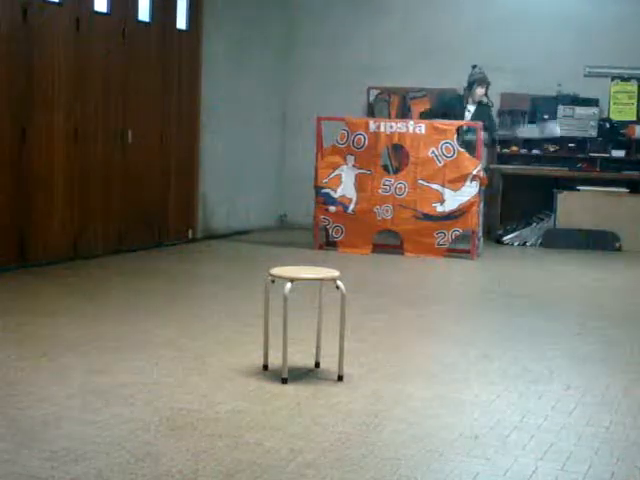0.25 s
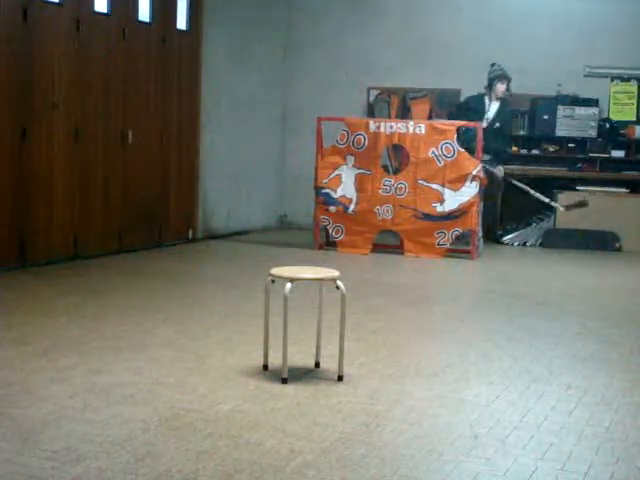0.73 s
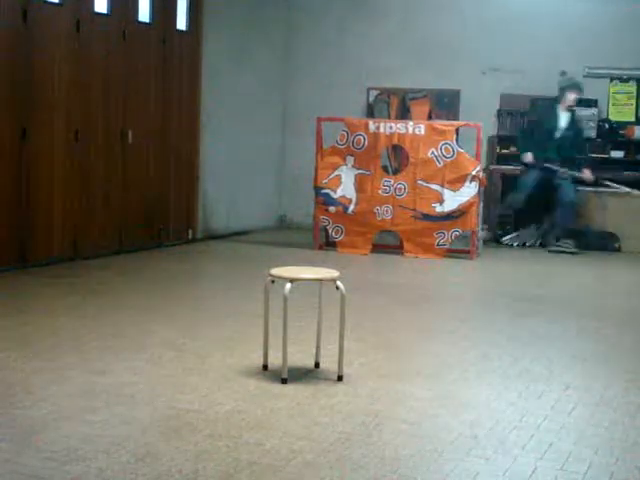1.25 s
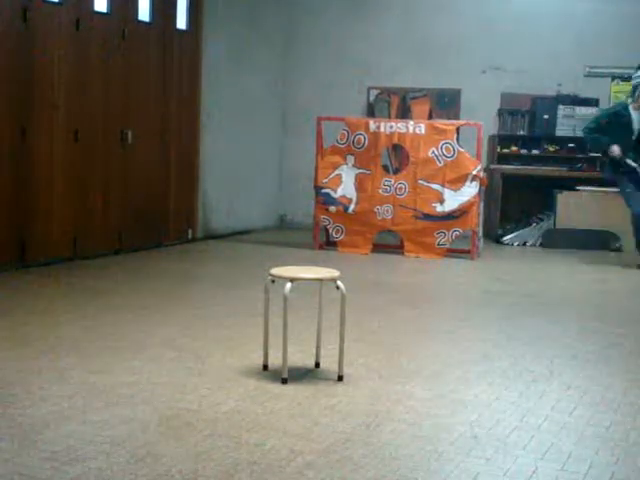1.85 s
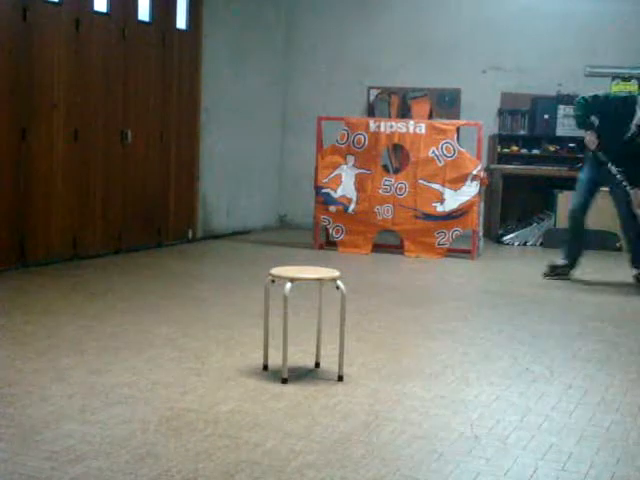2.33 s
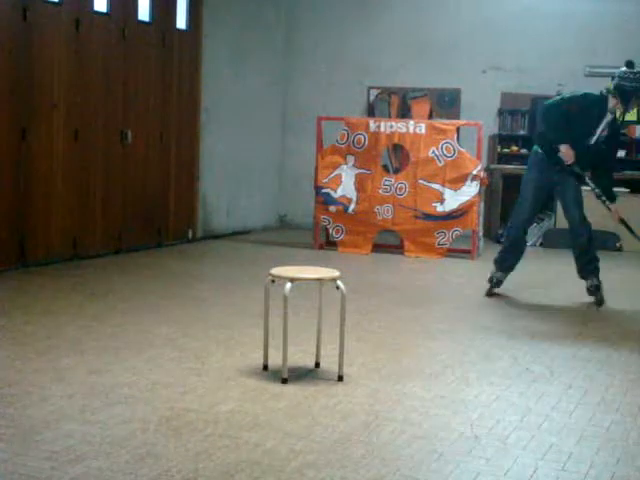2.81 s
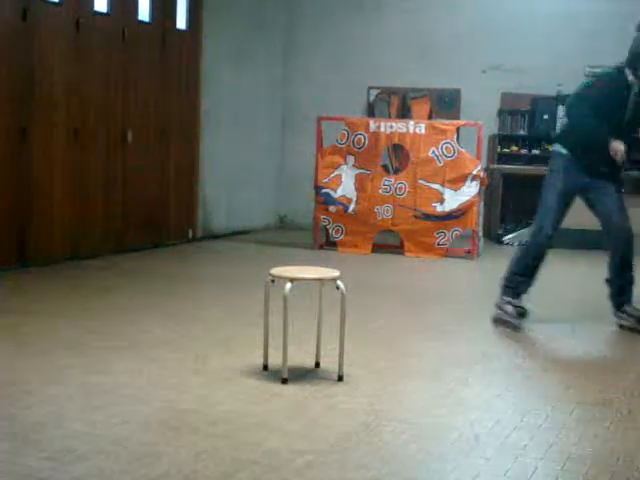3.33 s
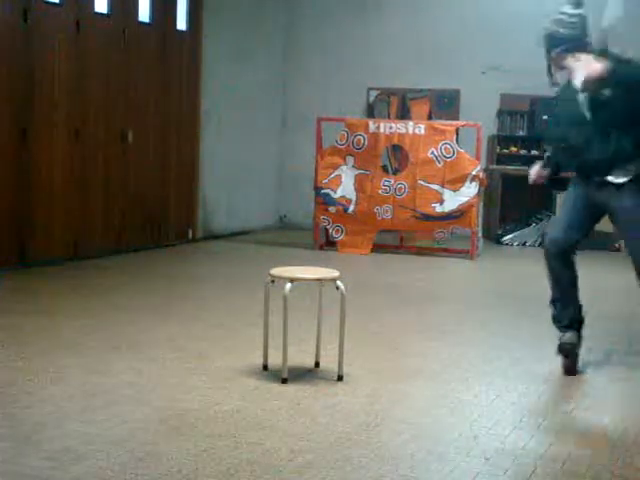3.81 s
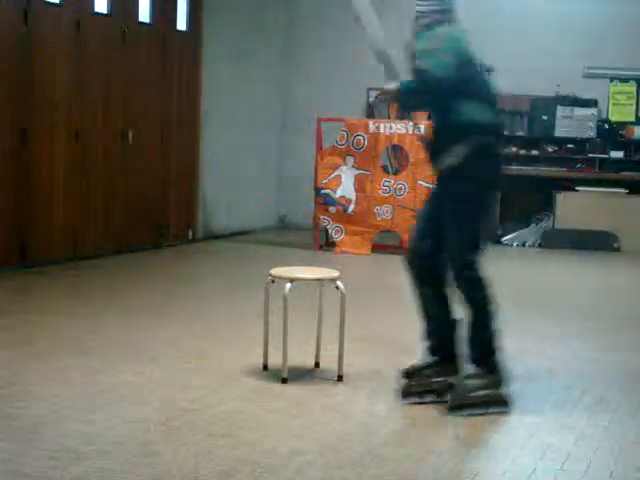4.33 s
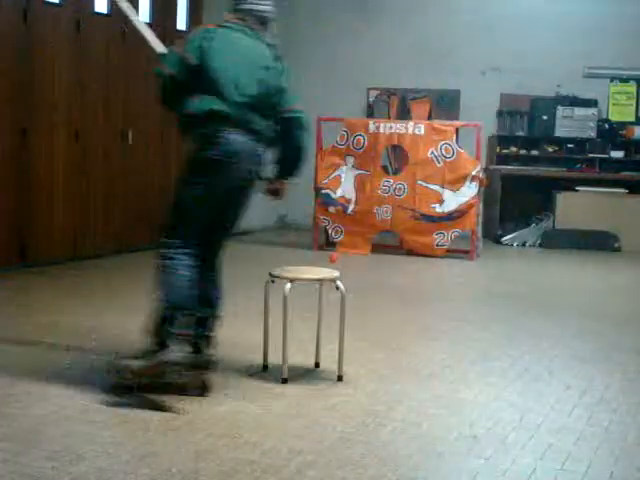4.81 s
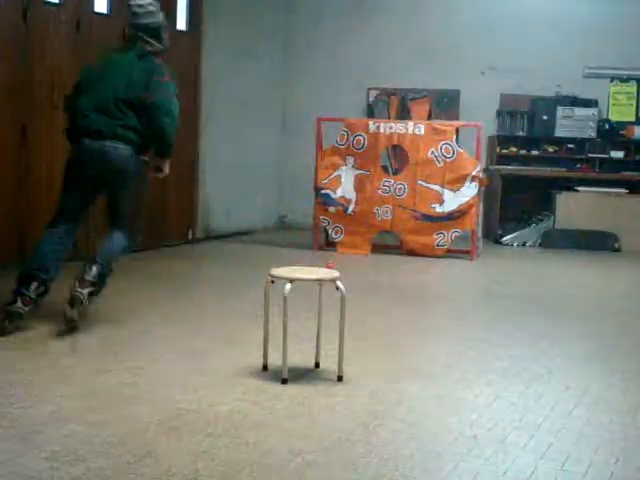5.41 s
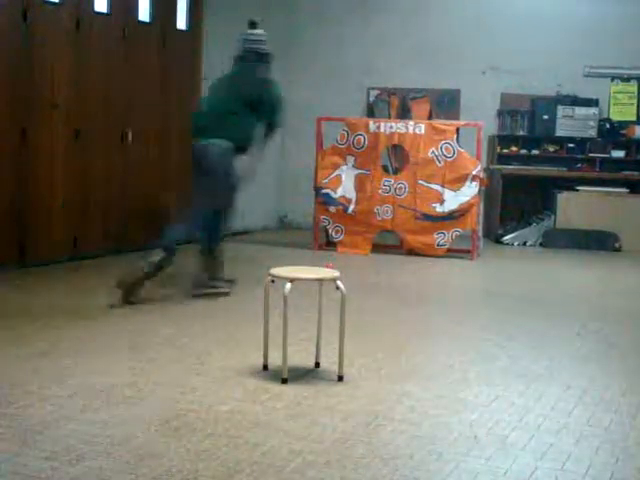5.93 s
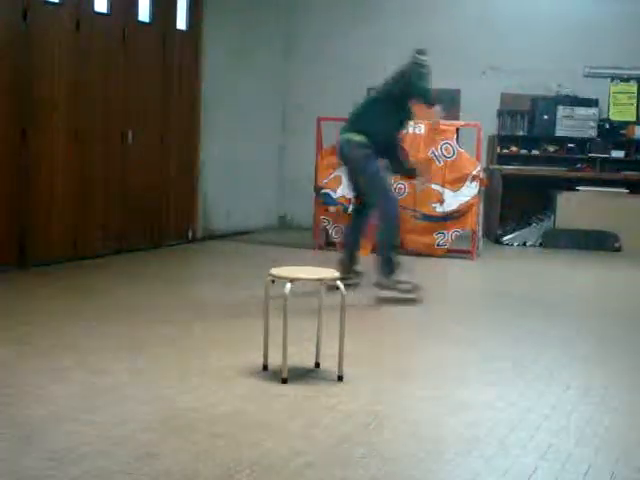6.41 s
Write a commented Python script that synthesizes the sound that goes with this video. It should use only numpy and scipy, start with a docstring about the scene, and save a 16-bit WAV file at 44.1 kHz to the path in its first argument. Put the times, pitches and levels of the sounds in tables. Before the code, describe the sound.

Inline skate wheels rumble and scrape over a tiled floor in an echoing hall while a stick slaps hard and knocks a plastic ball.

```python
"""A hockey stick slaps the floor and knocks a plastic ball as a player skates round a bare, tiled hall.
Blows of the stick, ball and skates each ring a body with its own resonances; one hollow bang rings far back.
The inline wheels are shaped noise that rumbles, ticks over tile joints and scrapes, with three wavering squeals.
Blows and wheels are heard together with the hall's echo, over a faint steady hiss.
A small camera some metres away rounds the loudest peaks and cuts the highest treble."""
import sys
import numpy as np
from scipy import signal
from scipy.fft import rfft, irfft, next_fast_len
from scipy.io import wavfile
from scipy.ndimage import uniform_filter1d

SR = 44100
rng = np.random.default_rng(int(sys.argv[2]) if len(sys.argv) > 2 else 0)


def file_out(sig):
    """Save sig as 16-bit WAV at sys.argv[1]."""
    # one column per channel
    cols = np.atleast_2d(sig).T
    # limit, then scale
    lim = np.clip(cols, -1, 1)
    pcm = np.round(lim * 32767).astype(np.int16)
    wavfile.write(sys.argv[1], SR, pcm)


N = 293706
TIME = np.arange(N) / SR

# Blows: [t/s, strength/dB against an ordinary blow, weight/dB per octave below WEIGHT_BELOW_HZ,
# hardness/dB per octave above a set pitch, direct sound/dB, extra ringing/dB]
# the blade slapping or skidding on the floor
STICK_BLOWS = [(2.2510, -8.5, 1, 9, -4.5, 18), (2.2562, -3, 1, -2, -1, 20),
               (2.7285, -0.5, -3, -0.5, -9, -28), (3.1435, -5, 1, -23, 1, 5),
               (3.1740, -32.5, -2, 19.5, -1, -20), (6.6238, -2.5, -3, -5, -4, 19)]
# the ball struck or bouncing: same columns
BALL_BLOWS = [(2.3100, -10.5, -4.5, -3.5, 1.5, -16), (2.9650, -18.5, -14, 0.2, 2, -7),
              (3.2140, -7.5, -6.5, -0.5, -0.5, 2.5), (3.8545, -13, 1.5, -1.2, -9, 3),
              (5.6675, -21, 10.5, 1, 1.5, -5), (5.8020, -26, -17, -2, 3.5, 5), (6.3470, -11, 9, 0.5, -4, 8)]
# skates set down, boots and buckles clacking: same columns
SKATE_BLOWS = [(.0640, -33.5, 1, 4.5, -4, -11), (.1750, -25.5, -4, -0.4, 3, 25),
               (1.0500, -34, -18, 0, 0.5, -1), (1.2655, -20, 2.5, -2.5, -21, -9),
               (1.6990, -32, 4, -8, -10, -1), (1.7265, -22, -2.5, 1.5, -19, 7),
               (2.0605, -17.5, 3, -5.5, -17.5, -23), (3.5510, -31, -2, 6, 2, -14),
               (3.5800, -22, 5, -1.5, 0, -19), (3.7710, -30, -19, 2.4, -15, -7),
               (4.1600, -32, -18, 4.5, -11, -10), (4.2850, -40, -12, 2, 7, -10),
               (4.7670, -39.5, 7, 4, 7.5, 16), (5.1800, -35, 8.5, -2, -1.5, -4),
               (5.9880, -33.5, 0, 4, -9, 15), (6.0090, -25.5, 7, -7.5, 0.5, 3)]
# a hollow bang far back, behind the goal: same columns
BANG_BLOWS = [(.5550, -3, 0.0067, 0.0073, -27, 3.9)]

# Broad sound of each thing in an ordinary blow: [f/Hz, level/dB per Hz]
STICK_BROAD = [(70, -63), (190, -47), (460, -17.5), (1025, -5), (1650, -4), (2200, -4), (3100, -4),
               (4200, -7), (7400, -22), (10000, -33.5)]
# the plastic ball: [f/Hz, level/dB per Hz]
BALL_BROAD = [(70, -55), (190, -26), (460, -8.5), (1025, -0.5), (2120, -6.5), (4060, -10.5), (7400, -18),
              (10000, -25)]
# the skate: [f/Hz, level/dB per Hz]
SKATE_BROAD = [(70, -36), (190, -12.5), (460, 0), (1025, -2), (2120, -5.5), (4060, -11.5), (7400, -17),
               (10000, -21)]
# the hollow thing: [f/Hz, level/dB per Hz]
HOLLOW_BROAD = [(70, -50), (190, -14.5), (500, -0.5), (1025, -1.5), (2120, -5), (4060, -17.5),
                (7400, -30.5), (10000, -38)]

# What each thing rings with, before a blow's extra ringing: [f/Hz, width/Hz, level/dB over its broad sound]
STICK_MODES = [(753, 130, -6), (996, 61, -9.5), (1317, 12, 18.5), (1780, 100, 16), (2100, 230, 12.5),
               (2330, 100, 16), (2770, 55, 14), (3210, 74, 5), (3460, 130, -6), (3860, 120, -1)]
# the plastic ball: same columns
BALL_MODES = [(636, 360, 3.5), (860, 50, 3.5), (1070, 200, 2.5), (1330, 27, -3), (1930, 290, 0.5),
              (2286, 230, 2), (3450, 330, 3.5), (4760, 100, 2), (6800, 230, 6)]
# the skate, with the hall's own low booms at 132, 203 and 252 Hz: same columns
SKATE_MODES = [(132, 72, 9.5), (203, 28, 8), (252, 45, 8), (330, 22, -17), (574, 190, -2), (1020, 280, -17),
               (1324, 60, -19), (2244, 100, -3), (2550, 100, -9)]
# the hollow thing: same columns
HOLLOW_MODES = [(654, 68, 3), (1050, 64, 6.5), (1125, 110, 5.5), (1468, 38, 8), (1860, 85, -7),
                (2980, 33, -2), (3620, 53, -3)]

# Wheels coasting, loudest as the skater passes the camera: [t/s, rolling level/dB before skate and hall]
COASTING = [(0, -86), (1.2, -56), (3.4, -63), (3.9, -48), (4.5, -52.5), (5.05, -66), (5.8, -68),
            (6.66, -62)]
# Pushes and turns that load the wheels:
# [t/s of the peak, swell/s, rolling level/dB, sideways scraping level/dB], levels before skate and hall
PUSHES = [(.02, 1, -40.5, -60), (.15, 0.14, -46, -42.5), (.9, 0.37, -58.5, -48.5), (1.86, 0.54, -49, -47.5),
          (2.401, 0.24, -31, -42), (4.32, .15, -42.5, -69), (4.76, 0.24, -48, -47.5),
          (5.3, 0.33, -51.5, -43), (5.62, 0.51, -48.5, -45.5), (5.97, 0.2, -66, -38.5),
          (6.1, 0.13, -53, -66)]
# A wheel squealing as it skids round the turn:
# [t/s, length/s, first f/Hz, last f/Hz, level/dB before the hall]
WHEEL_SQUEALS = [(5.188, 0.23, 2333, 3230, -49.5), (5.392, 0.094, 3050, 2900, -44),
                 (5.531, 0.19, 4240, 3660, -43)]

# Colour of the rolling wheels, only its shape counts: [f/Hz, level/dB per Hz]
ROLL_COLOUR = [(40, -32), (100, -30), (200, -11), (350, -3), (600, 7), (1000, -2.5), (2000, -6.5),
               (4000, -9.5), (10000, -17)]
# colour of the sideways scraping: same columns
SCRAPE_COLOUR = [(150, -11), (600, 4), (1400, -0.5), (2400, 2.5), (3800, -0.5), (5500, -4), (7500, -4),
                 (10000, -10.5)]
# colour of the steady hiss: same columns
HISS_COLOUR = [(25, -12), (60, -12.5), (150, 3), (500, 12.5), (1200, 5.5), (3000, -4), (6000, -9.5),
               (10000, -11.5)]
# How long the hall's echo takes to fade by 60 dB: [f/Hz, t60/s]
HALL_DECAY = [(100, 0.83), (200, 0.72), (450, 0.57), (1000, 0.76), (2200, 0.8), (4500, 0.7), (9000, 0.53)]

WEIGHT_BELOW_HZ = 536  # a heavy blow lifts what lies below
UNEVEN_DB = 1.5  # typical random change of each resonance from blow to blow
BUILD_S = 0.0024  # build-up time of a blow's echo when its direct sound is at 0 dB
BUILD_HALVING_DB = 14  # the echo builds up in half the time when the direct sound is this much stronger
COAST_SCRAPE_DB = -11.5  # scraping while coasting, against the rolling
STRIDE_RELEASE_S = 0.29  # swell and release each span 20 dB
HISS_DB = -55.5
TOP_HZ = 10050  # the camera passes nothing much above this


def stick_slaps():
    """The stiff blade hits the floor and rings; hardness brightens only the upper treble."""
    return blows(STICK_BLOWS, STICK_BROAD, STICK_MODES, hard_above_hz=3080.0)


def ball_knocks():
    """The plastic ball rings with broad, quickly fading resonances when struck or bouncing."""
    return blows(BALL_BLOWS, BALL_BROAD, BALL_MODES, gain_db=2.0)


def skate_steps():
    """Skates set down with the clack of boots and buckles, and the hall booms low with them."""
    return blows(SKATE_BLOWS, SKATE_BROAD, SKATE_MODES, gain_db=-0.3)


def blows(table, broad, modes, gain_db=0.0, hard_above_hz=1410.0):
    """Each blow rings its body once, tilted by weight and hardness, and sets off the hall from a new spot."""
    out = np.zeros(N)
    hz, broad_db = np.transpose(broad)
    octaves_below = np.clip(np.log2(WEIGHT_BELOW_HZ / hz), 0, 1.6)
    octaves_above = np.clip(np.log2(hz / hard_above_hz), 0, 2)
    for when, strength_db, weight, hardness, direct_db, ringing_db in table:
        spectrum_db = broad_db + strength_db + weight * octaves_below + hardness * octaves_above
        # each contact point favours other resonances
        extra_db = ringing_db + UNEVEN_DB * rng.standard_normal(len(modes))
        spot_modes = [(f, width, db + extra) for (f, width, db), extra in zip(modes, extra_db)]
        body = ring(np.c_[hz, spectrum_db], spot_modes)
        build_s = BUILD_S * 2 ** (-direct_db / BUILD_HALVING_DB)
        sound = signal.fftconvolve(body, hall(direct_db, build_s))
        start = int(when * SR)
        out[start:start + len(sound)] += sound[:N - start]
    return out * undb(gain_db)


def wheels(joints_per_s=140.0, joint_db=1.0, grit=0.97):
    """Wheels rumble and tick over tile joints; pushed sideways they grate in tiny slips."""
    lead = SR // 2  # half a second early: the skater already moves and the hall already sounds
    t = np.arange(-lead, N) / SR
    roll_gain, scrape_gain = wheel_load(t)
    tread, bumps, slips, slip_sizes = rng.standard_normal((len(t), 4)).T
    # joints come at random moments, this many a second on average
    joint_hit = rng.random(len(t)) < joints_per_s / SR
    joints = unit(bumps * joint_hit)
    rolling = colour(tread + undb(joint_db) * joints, ROLL_COLOUR) * roll_gain
    # a larger grit makes the slips more uneven
    scraping = colour(slips * np.exp(grit * slip_sizes), SCRAPE_COLOUR) * scrape_gain
    skate_body = ring([(20, 0), (TOP_HZ, 0)], SKATE_MODES)
    path = signal.fftconvolve(hall(8.9, 0.0092), skate_body)
    return signal.fftconvolve(rolling + scraping, path / np.linalg.norm(path))[lead:lead + N]


def wheel_load(t):
    """Load sets the gains of rolling and scraping: coasting, plus a swell and release for every push."""
    coast = undb(np.interp(t, *np.transpose(COASTING)))
    roll_power = coast ** 2
    scrape_power = (coast * undb(COAST_SCRAPE_DB)) ** 2
    for peak_s, swell_s, roll_db, scrape_db in PUSHES:
        swell = (peak_s - t) / swell_s
        release = (t - peak_s) / STRIDE_RELEASE_S
        load = undb(-20 * np.maximum(swell, release))
        roll_power = roll_power + (load * undb(roll_db)) ** 2
        scrape_power = scrape_power + (load * undb(scrape_db)) ** 2
    return np.sqrt(roll_power), np.sqrt(scrape_power)


def squeal(jitter=0.092, jitter_hz=455.0, throb_db=1.0, half_db=-7.5):
    """The wheel sticks and slips unsteadily; every other slip is stronger, which adds the octave below."""
    wander = colour(rng.standard_normal(N), [(jitter_hz, 0), (2 * jitter_hz, -40)])
    throb = colour(rng.standard_normal(N), [(40, 3), (120, -76)])
    out = np.zeros(N)
    for start, length, first_hz, last_hz, level_db in WHEEL_SQUEALS:
        on = (TIME >= start) & (TIME < start + length)
        progress = (TIME[on] - start) / length
        pitch = first_hz + (last_hz - first_hz) * progress
        phase = 2 * np.pi * np.cumsum(pitch * (1 + jitter * wander[on])) / SR
        gain = np.sin(np.pi * progress) * undb(level_db + throb_db * throb[on])
        out[on] += gain * (np.sin(phase) + undb(half_db) * np.sin(phase / 2))
    path = hall(7.8, 0.005)
    return signal.fftconvolve(out, path / np.linalg.norm(path))[:N]


def hollow_bang():
    """One blow on something hollow rings mostly in the middle pitches, with little direct sound."""
    return blows(BANG_BLOWS, HOLLOW_BROAD, HOLLOW_MODES)


def steady_hiss():
    """Faint random noise at an even level, strongest in the lower middle pitches."""
    return colour(rng.standard_normal(N), HISS_COLOUR) * undb(HISS_DB)


def hall(direct_db, build_s, hold_s=0.02, sparse=0.97, merge_s=0.071, direct=23.4, chatter_s=0.0033, size=57600):
    """Path from one floor spot: direct sound, uneven wall echoes, then a dense tail fading by pitch band."""
    t = np.arange(size) / SR
    hz = np.fft.rfftfreq(size, 1 / SR)
    signs, sizes, chatter = rng.standard_normal((3, size))
    # early echoes differ widely in size, so single ones stand out; later they merge
    spread = sparse * np.exp(-t / merge_s)
    echoes = rfft(signs * np.exp(spread * sizes - spread ** 2))
    age = np.hypot(t, hold_s) - hold_s  # the level holds while the sound is still filling the hall
    centres, t60s = np.transpose(HALL_DECAY)
    tail = np.zeros(size)
    for band, t60 in zip(np.eye(len(centres)), t60s):
        band_echoes = irfft(echoes * along(hz, np.c_[centres, band]))
        tail += band_echoes * np.exp(-np.log(1000) * age / t60)
    tail = tail * (1 - np.exp(-t / max(build_s, 1 / SR)))
    # the contact chatters and the floor mirrors it for a few milliseconds
    first = chatter * np.exp(-t / chatter_s)
    return tail + direct * undb(direct_db) * first / np.linalg.norm(first)


def ring(points, modes, size=4096):
    """A struck body's response: a broad spectrum with resonances, starting at the blow and never before."""
    hz = np.fft.rfftfreq(size, 1 / SR)
    power = 1 + sum(undb(db) ** 2 / (1 + (2 * (hz - f) / width) ** 2) for f, width, db in modes)
    power = power / uniform_filter1d(power, size=101)  # resonances gather the energy of their neighbourhood
    # folding the cepstrum puts the energy as early as the spectrum allows (minimum phase)
    cepstrum = irfft(np.log(undb(along(hz, points)) * np.sqrt(power)))
    cepstrum[1:size // 2] *= 2
    cepstrum[size // 2 + 1:] = 0
    return irfft(np.exp(rfft(cepstrum)))


def colour(x, points):
    """Give a sound a spectrum, at rms 1."""
    size = next_fast_len(len(x))
    gain = undb(along(np.fft.rfftfreq(size, 1 / SR), points))
    return unit(irfft(rfft(x, size) * gain, size)[:len(x)])


def along(hz, points):
    """Join (f/Hz, value) points by straight lines over log frequency."""
    at, value = np.transpose(points)
    return np.interp(np.log(hz + 1), np.log(at), value)


def unit(x):
    """The same sound at rms 1."""
    return x / np.sqrt(np.mean(x ** 2))


def undb(db):
    """Decibels to gain."""
    return 10 ** (np.asarray(db) / 20)


def scene():
    """Stick, ball, skates and wheels, with a far bang, over a faint steady hiss."""
    struck = stick_slaps() + ball_knocks() + skate_steps()
    skating = wheels() + squeal()
    background = hollow_bang() + steady_hiss()
    return (struck + skating + background)[None]


def record(dry, ceiling=0.87):
    """The camera rounds the loudest peaks and cuts the highest treble."""
    rounded = ceiling * np.tanh(dry / ceiling)
    low_pass = signal.ellip(12, 0.2, 70, TOP_HZ, fs=SR, output="sos")  # 0.2 dB ripple, 70 dB cut
    return signal.sosfilt(low_pass, rounded)


dry = scene()
out = record(dry)
file_out(out)
```